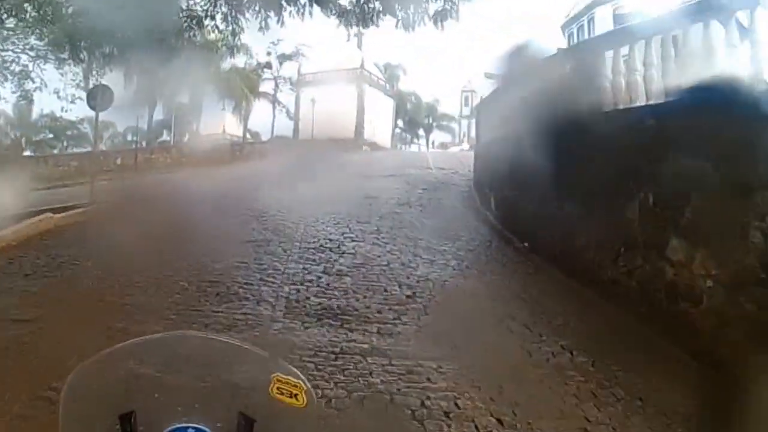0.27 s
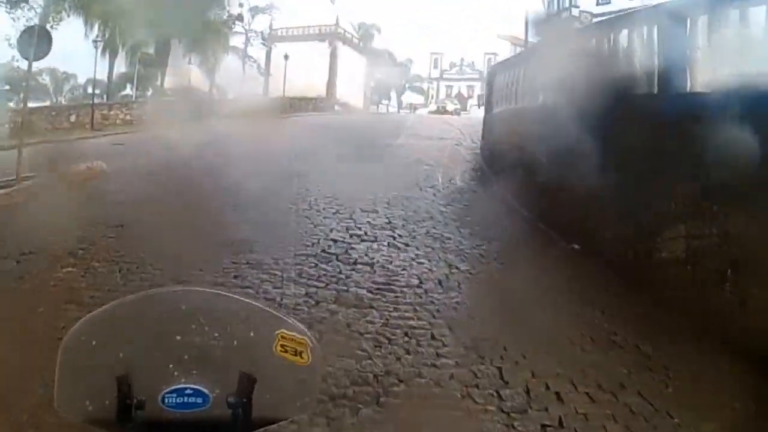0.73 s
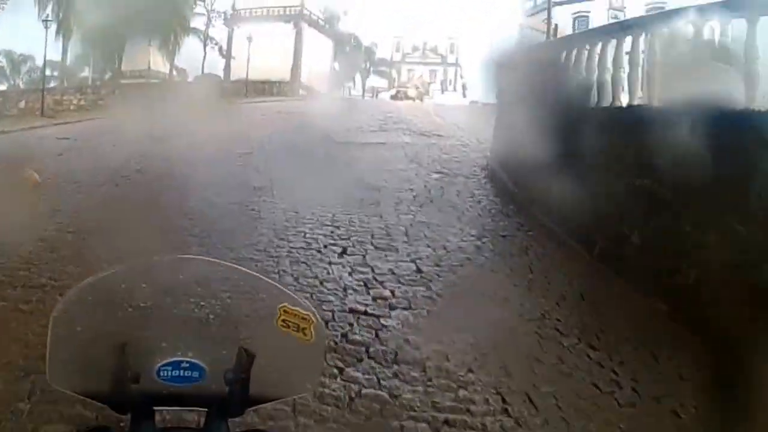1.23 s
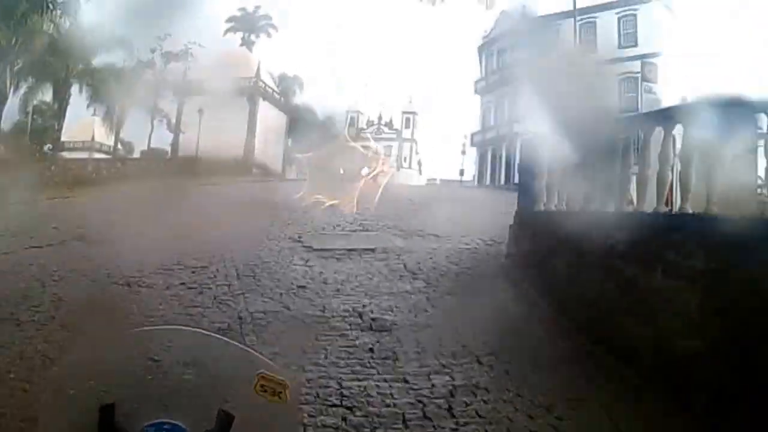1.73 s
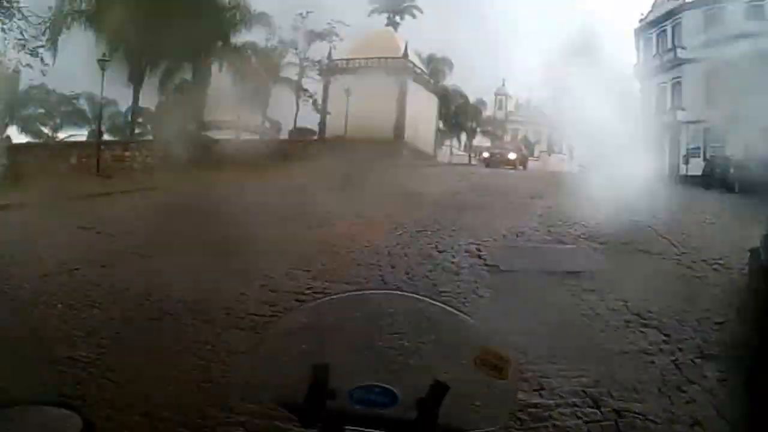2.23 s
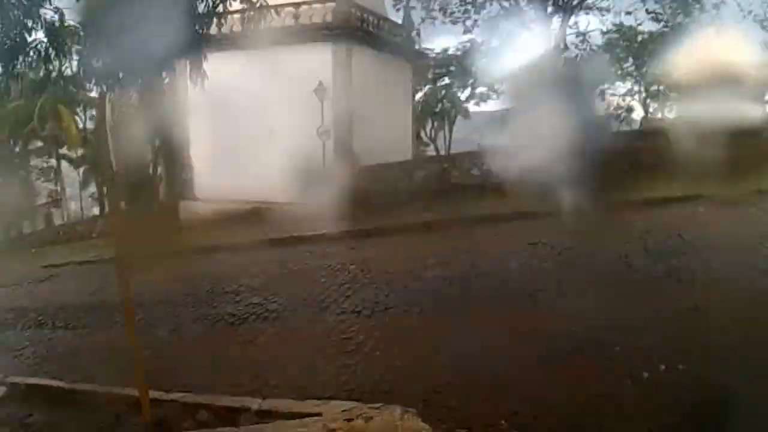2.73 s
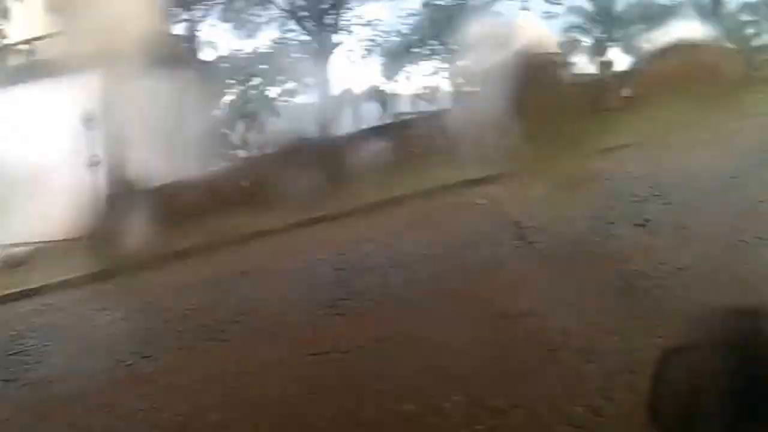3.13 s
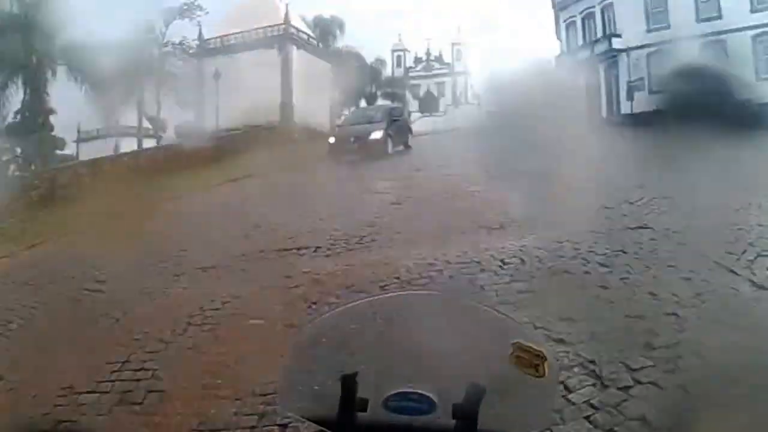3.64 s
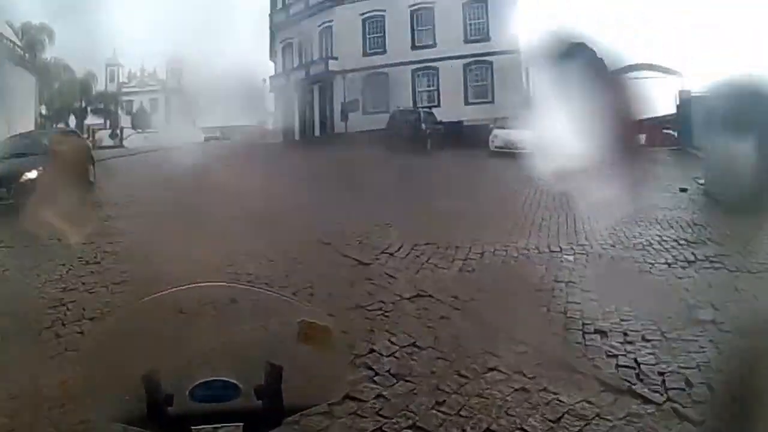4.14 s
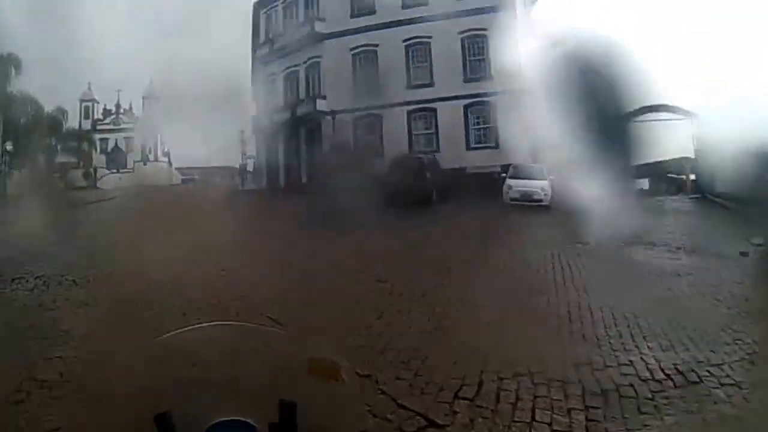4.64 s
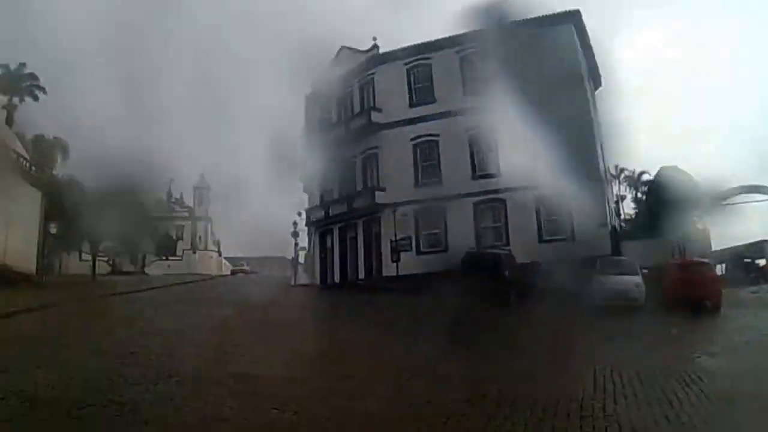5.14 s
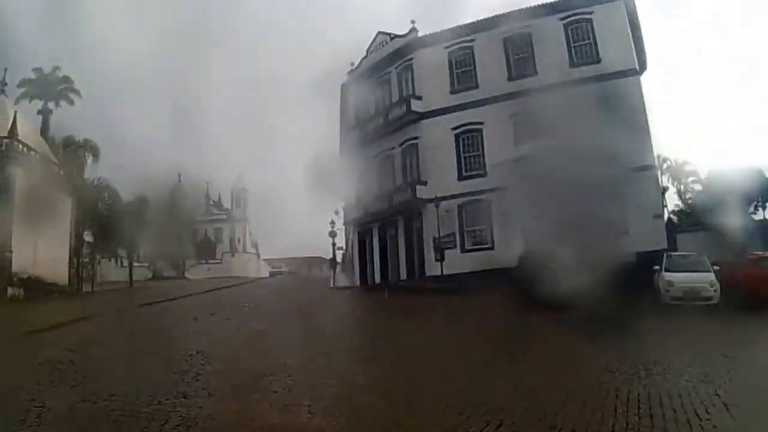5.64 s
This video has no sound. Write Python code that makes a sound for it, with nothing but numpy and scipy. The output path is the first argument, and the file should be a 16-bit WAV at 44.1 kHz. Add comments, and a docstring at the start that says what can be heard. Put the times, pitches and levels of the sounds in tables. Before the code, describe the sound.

Close, boxed-in sound: fine rain patters constantly on hard plastic while single larger drops pop at random, dry and mid-pitched. Small dull bumps with loose rattling interrupt now and then, strongest near three seconds. Two very loud drops strike just before four and a half seconds, then dense tapping continues to the end. Engine and tyres are only a weak, muffled rumble behind soft rain wash and faint electronic hiss.

```python
"""Inside a sealed waterproof camera case on a motorcycle riding slowly over wet cobbles in the rain.
Drops tap the plastic: random pushes ring the modes of its wall, with a burst of noise for the spatter.
The mount knocks over the bumps: a blow and sparse loose contacts drive its modes and rattle the case.
Behind lie shaped noise for the muffled rain wash and faint rumble, and the recorder's own hum and hiss."""
import sys
import numpy as np
from scipy import signal
from scipy.fft import rfft, irfft
from scipy.io import wavfile

SR = 44100
rng = np.random.default_rng(int(sys.argv[2]) if len(sys.argv) > 2 else 0)


def master(y):
    """Save y as 16-bit WAV."""
    cut = np.clip(np.atleast_2d(y).T, -1, 1)
    pcm = np.round(cut * 32767)  # scale
    wavfile.write(sys.argv[1], SR, pcm.astype(np.int16))


N = 259749
TAP = np.arange(4096) / SR  # time axis of one short sound, in seconds
LEVEL_SPAN_S = .02  # short sounds are levelled as if their energy filled this span

RING_HZ, RING_T60_S = 1340, .032  # main mode of the case
MOUNT_HZ, MOUNT_T60_S = 308.5, 0.037  # main mode of the mount, before a knock's hardness shifts it
MOUNT_NUDGE_DB = -34.5  # a drop also nudges the mount: level over its ring

# Single drops on the case, each placed in time, from faint to loud; sharpness is tick level over ring
# columns: start_s [s], ring_db [dB], ring_hz [Hz], overtone_hz [Hz], sharpness_db [dB]
SINGLE_DROPS = [(.2584, -45, 1177, 1810, -23.5), (.4498, -59.5, 1174, 1830, -16.5),
                (.489, -58.5, 1320, 2000, -22.5), (.5896, -59.5, 1150, 1830, -12),
                (.952, -58, 1390, 1840, -20), (1.1447, -58, 1390, 1980, -20),
                (1.1574, -44, 1342, 1910, -13), (1.3474, -66, 1330, 1850, -5),
                (1.4531, -51.5, 1160, 1830, -20), (1.6944, -75.5, 1360, 2000, 11),
                (2.3126, -62, 1444, 2080, -10), (2.5996, -54.5, 1386, 1760, -14.5),
                (2.7632, -48, 1330, 1900, -12.5), (3.0722, -53.5, 1073, 2210, -23),
                (3.3296, -39.5, 1392, 2210, -1.5), (3.3866, -56.5, 1180, 1810, -14.5),
                (3.6254, -51, 1210, 1800, -22.5), (3.7044, -51, 1310, 2000, -13.5),
                (3.7507, -48, 1360, 1860, -23), (3.8856, -49.5, 1275, 1860, -23.5),
                (3.9347, -65, 1360, 2500, -4.5), (4.1047, -62.5, 1230, 2160, -4.5),
                (4.3173, -58, 1310, 1970, -14), (4.378, -30, 1393, 2420, -19),
                (4.4715, -28, 1368, 2256, -19), (4.5891, -57, 1504, 1730, -9),
                (4.7735, -49.5, 1395, 2120, -17.5), (4.7867, -40, 1340, 2150, -20.5),
                (4.8267, -56.5, 1124, 1710, -19), (4.871, -58, 1310, 1970, -9.5),
                (4.8881, -40, 1417, 1710, -13.5), (4.9865, -50.5, 1370, 2020, -17),
                (5.0316, -50, 1220, 1760, -12), (5.0444, -39.5, 1340, 1750, -33),
                (5.181, -44.5, 1357, 1660, -22.5), (5.3371, -49.5, 1350, 1820, -8),
                (5.3588, -49.5, 1390, 2110, -13.5), (5.4531, -49.5, 1360, 1850, -7),
                (5.4691, -38.5, 1360, 2120, -15.5), (5.4899, -46, 1375, 1800, -8.5),
                (5.5855, -41.5, 1204, 2170, -27), (5.594, -46.5, 1380, 1830, -17.5),
                (5.6148, -51, 1440, 1750, -18), (5.6268, -52.5, 1350, 2030, -27),
                (5.6587, -44, 1360, 1700, -26.5), (5.6841, -46, 1290, 2100, -13.5),
                (5.8198, -42, 1444, 1740, -27.5)]
# Modes of the case wall above its main ring: pitch_hz [Hz], t60_s [s], level_db [dB]
UPPER_MODES = [(1700, .017, 1), (2020, .014, 0), (2330, .011, -3), (2620, .010, -8)]
# High wall modes that make the tick: pitch_hz [Hz], t60_s [s], level_db [dB]
TICK_MODES = [(3700, .009, 0), (4100, .008, 0), (4750, .008, -4), (5300, .007, -7)]
# Spectrum of the spatter: pitch_hz [Hz], level_db [dB per Hz]
SPATTER_SPECTRUM = [(5000, -6.5), (6000, -20), (7000, -4), (8000, -49), (9500, -4.5), (13000, -1),
                    (15800, -0.5)]


def rain_on_case():
    """Each drop pushes the wall, rings its modes and bursts into fine spatter."""
    ring, upper, tick, push, spatter_power = np.zeros((5, N))
    for start_s, ring_db, ring_hz, overtone_hz, sharp_db in list(SINGLE_DROPS) + small_drops():
        upper_db, push_db = drop_colour(ring_db, ring_hz, sharp_db)

        # the struck spot swells for a few cycles, with the main mode of the case ringing on
        swell = mode(ring_hz, .014) * (1 - np.exp(-TAP / .002))
        handed_on = np.interp(ring_db, [-46, -30], [.3, .1])
        main = swell + handed_on * mode(RING_HZ, RING_T60_S)
        struck = strike(splash(spread_s=0.0013, rough=0.11), main)
        add(ring, start_s, burst(band(struck, .82 * ring_hz, 1.69 * ring_hz, order=4), ring_db))

        overtones = mode(overtone_hz, 0.017) + 0.46 * wall(UPPER_MODES)
        add(upper, start_s, burst(strike(splash(spread_s=0.0012, rough=0.18), overtones), upper_db))

        ticking = strike(splash(spread_s=0.0016, rough=0.29), wall(TICK_MODES))
        add(tick, start_s, burst(ticking, ring_db + sharp_db))

        dull_push = burst(mode(853, 0.006), push_db)
        nudge = burst(mode(MOUNT_HZ, 0.061), ring_db + MOUNT_NUDGE_DB)
        add(push, start_s, dull_push + nudge)

        # loud, sharp drops throw the most spatter; overlapping bursts add as power
        spatter_db = ring_db + sharp_db + np.interp(ring_db, [-55, -40], [-11, -8])
        add(spatter_power, start_s, burst(np.exp(-TAP / 0.0013), spatter_db) ** 2)

    # the stiff wall passes little below its modes
    body = ring + band(upper, 1300, 2980, order=4) + band(tick, 3300, 5250, order=6)
    spatter = np.sqrt(spatter_power) * noise(SPATTER_SPECTRUM, 0)
    return body + band(push, 230, 906) + spatter


# A sharper drop has more overtone: level over the ring at the usual sharpness, dB gained per dB
USUAL_SHARP_DB, OVERTONE_DB, OVERTONE_SLOPE = -17, -1.5, 0.68
# Ring level beyond which the wall gives no further, and dB of push lost per dB of sharpness
YIELD_DB, PUSH_SLOPE = -40.5, 0.17
# A soft, low-ringing spot gives way more, at the usual sharpness
# columns: ring_hz [Hz], push_over_ring_db [dB]
PUSH_BY_RING = [(1060, -2), (1180, -21.5), (1345, -19.5), (1410, -31.5)]


def drop_colour(ring_db, ring_hz, sharp_db):
    """Levels of overtone and dull push follow from a drop's strength, spot and sharpness."""
    extra_db = sharp_db - USUAL_SHARP_DB
    upper_db = ring_db + OVERTONE_DB + OVERTONE_SLOPE * extra_db
    softness_db = np.interp(ring_hz, *np.transpose(PUSH_BY_RING))
    push_db = min(ring_db, YIELD_DB) + softness_db - PUSH_SLOPE * extra_db
    return upper_db, push_db


RAIN_PER_S = 43  # mean rate of small drops
SMALL_SHARP_DB, SHARP_SPREAD_DB = -15.5, 6  # usual sharpness, and its spread before the cap
# Typical ring level of the small drops over time: start_s [s], level_db [dB]
SMALL_DROP_LEVEL = [(0, -74.5), (.6, -74.5), (1.3, -67), (1.9, -72.5), (2.5, -74.5), (3.2, -70.5),
                    (4.1, -65), (4.7, -71), (5.2, -64.5), (5.89, -72.5)]


def small_drops():
    """Fine rain among the single drops: random times, sizes and spots, in the columns of SINGLE_DROPS."""
    chance = rng.standard_normal((600, 4))
    times = np.cumsum(rng.exponential(1 / RAIN_PER_S, len(chance)))
    size_db = 5 * np.minimum(chance[:, 0], 1.5)
    ring_db = np.interp(times, *np.transpose(SMALL_DROP_LEVEL)) + size_db
    ring_hz = RING_HZ * (1 + .025 * chance[:, 1])
    overtone_hz = 1900 * (1 + .09 * chance[:, 2])
    sharp_db = SMALL_SHARP_DB + SHARP_SPREAD_DB * np.minimum(chance[:, 3], 1)
    drops = zip(times, ring_db, ring_hz, overtone_hz, sharp_db)
    return [drop for drop in drops if drop[0] < N / SR]


DRIZZLE_PER_S, DRIZZLE_DB = 400, -70.5  # mean rate of droplets, overall level


def drizzle():
    """Tiny droplets, hundreds a second, keep the main mode of the case ringing."""
    hits = rng.standard_normal(N) * (rng.random(N) < DRIZZLE_PER_S / SR)
    ring = band(signal.fftconvolve(hits, mode(RING_HZ, RING_T60_S))[:N], 1000, 2100)
    return ring * undb(DRIZZLE_DB) / ring.std()


# Only a jolt that rattles the case above this level sets it swaying
SWAY_FROM_DB, SWAY_UNDER_RATTLE_DB = -61, -9.5
# Knocks of the mount: start_s [s], knock_db [dB], rattle_db [dB]
KNOCKS = [(.643, -69, -74), (.784, -66, -69), (0.9886, -55, -56.5), (1.083, -67.5, -57),
          (1.72, -68.5, -67.5), (2.136, -71.5, -66.5), (2.332, -74, -71), (2.718, -56, -54.5),
          (3.019, -64.5, -54.5), (3.1155, -54, -51), (3.203, -69.5, -58.5), (5.1808, -55, -56),
          (5.295, -70, -56)]
# Further modes of the mount: pitch_hz [Hz], t60_s [s], level_db [dB]
MOUNT_MODES = [(170, 0.021, -17), (407, 0.036, -13.5), (603, 0.017, -2.5), (710, 0.022, -20)]


def mount_knocks():
    """On a bump the mount hits its stop: a dull knock, a rattle, late ticks and, if strong, a low sway."""
    out = np.zeros(N)
    blow = signal.unit_impulse(len(TAP))
    for start_s, knock_db, rattle_db in KNOCKS:
        # a hard knock presses the joint tight: higher, shorter and brighter than a gentle one
        hard = np.clip((knock_db + 68) / 12, 0, 1)
        main = mode(MOUNT_HZ * (0.82 + .15 * hard), MOUNT_T60_S * (1.5 - 0.74 * hard))
        mount = main + wall(MOUNT_MODES)
        knock = band(strike(blow + 0.17 * chatter(0.024), mount), 155, 560 + 660 * hard)

        # loose contacts ring the wall
        loose = chatter(0.022) + 0.17 * blow
        contacts = strike(blow + .5 * loose, splash(spread_s=.0005, rough=.12))
        case = mode(1270, .012) + .25 * wall(UPPER_MODES)
        rattle = band(strike(contacts, case), 800, 2600)
        add(out, start_s, burst(knock, knock_db) + burst(rattle, rattle_db))

        if rattle_db > SWAY_FROM_DB:
            sway = -mode(38, .16) + .35 * mode(100, .23) + .4 * mode(78, .1)
            add(out, start_s + .004, burst(sway, rattle_db + SWAY_UNDER_RATTLE_DB))

        # the same loose contacts tick sharply, a moment later
        scratch = strike(loose, splash(spread_s=0.00063, rough=0.21))
        wall_tick = burst(band(strike(scratch, wall(TICK_MODES)), 3100, 5200, order=4), 0)
        fine_tick = burst(band(scratch, 9500, 15000, order=5), 0)
        add(out, start_s + .007, burst(wall_tick + fine_tick, rattle_db - 15))
    return out


WASH_DB, RUMBLE_DB = -73.5, -83  # levels before the random wander
# Spectrum of the muffled rain wash: pitch_hz [Hz], level_db [dB per Hz]
WASH_SPECTRUM = [(600, -16), (880, -15), (1130, -1.5), (1250, -2.5), (1580, -16.5), (1750, -3.5),
                 (2020, -4.5), (2300, -13), (2650, -12.5), (3200, -27.5), (3950, -15), (4700, -31),
                 (6000, -46)]
# Spectrum of the faint rumble: pitch_hz [Hz], level_db [dB per Hz]
RUMBLE_SPECTRUM = [(15, 6.5), (35, -1.5), (70, 1.5), (105, 2), (150, 0), (200, 1.5), (295, 3), (380, -3.5),
                   (500, -10), (700, -37)]


def ride():
    """Rain wash, engine and tyres through the closed case: two shaped noises whose levels wander."""
    wash = noise(WASH_SPECTRUM, WASH_DB) * undb(2 * walk(90))
    rumble = noise(RUMBLE_SPECTRUM, RUMBLE_DB) * undb(walk(9.9))
    return wash + rumble


HISS_DB = -82
# Faint steady hum tones: pitch_hz [Hz], level_db [dB]
HUM_TONES = [(60, -91.5), (120, -101), (180, -100), (240, -113.5), (300, -91.5), (600, -95.5)]
# Spectrum of the hiss: pitch_hz [Hz], level_db [dB per Hz]
HISS_SPECTRUM = [(5000, -14.5), (8000, -15), (10000, -3), (12500, 2.5), (15800, 1.5)]


def electronics():
    """The recorder's own faint hum, as steady sines, and hiss, as shaped noise."""
    t = np.arange(N) / SR
    hum = np.zeros(N)
    for hz, db in HUM_TONES:
        hum += np.sqrt(2) * undb(db) * np.sin(2 * np.pi * (hz * t + rng.random()))
    return hum + noise(HISS_SPECTRUM, HISS_DB)


def splash(spread_s, rough):
    """Force of a drop: the first contact, then an uneven push as the water spreads."""
    force = rough * rng.standard_normal(len(TAP)) * np.exp(-TAP / spread_s)
    force[0] += 1
    return force


def chatter(decay_s):
    """Sparse little contacts of loose parts, dying away."""
    contacts = rng.random(len(TAP)) < 220 / SR  # 220 per second on average
    return rng.standard_normal(len(TAP)) * contacts * np.exp(-TAP / decay_s)


def mode(hz, t60):
    """One struck resonance: a sine that falls 60 dB in t60 seconds."""
    return np.sin(2 * np.pi * hz * TAP) * np.exp(-np.log(1000) * TAP / t60)


def wall(modes):
    """A set of modes, weighted and detuned afresh at every strike."""
    chance = rng.standard_normal((len(modes), 2)) * (3, .025)  # spread in dB, and as a share of pitch
    return sum(undb(db + lift_db) * mode(hz * (1 + detune), t60)
               for (hz, t60, db), (lift_db, detune) in zip(modes, chance))


def strike(force, response):
    """Drive a response with a force."""
    return signal.fftconvolve(force, response)[:len(TAP)]


def noise(points, db):
    """Noise with a spectrum of (Hz, dB) points, falling away beyond both ends."""
    hz, gain_db = np.transpose(points)
    f = np.maximum(np.arange(N // 2 + 1) * SR / N, 1)
    skirts = np.minimum(f / hz[0], 1) ** 2 * np.minimum(hz[-1] / f, 1) ** 6
    shape = skirts * undb(np.interp(np.log(f), np.log(hz), gain_db))
    x = irfft(rfft(rng.standard_normal(N)) * shape, N)
    return x * undb(db) / x.std()


def walk(rate):
    """Random wander with a spread a little under 1, through `rate` random knots per second."""
    knots = rng.standard_normal(int(N / SR * rate) + 2)
    return np.interp(np.arange(N) / SR * rate, np.arange(len(knots)), knots)


def band(x, lo_hz, hi_hz, order=2):
    """Causal band-pass."""
    edges = [lo_hz, min(hi_hz, .49 * SR)]
    return signal.sosfilt(signal.butter(order, edges, "band", fs=SR, output="sos"), x)


def burst(x, db):
    """Scale a short sound to a level taken over LEVEL_SPAN_S."""
    return x * undb(db) / np.sqrt(np.sum(x ** 2) / (LEVEL_SPAN_S * SR))


def add(track, start_s, x):
    """Mix a short sound into a track at its start time."""
    i = int(start_s * SR)
    track[i:i + len(x)] += x[:len(track) - i]


def undb(db):
    """Decibels to gain."""
    return 10 ** (np.asarray(db) / 20)


def scene():
    """Everything reaches one microphone inside the case."""
    return (rain_on_case() + drizzle() + mount_knocks() + ride() + electronics())[None]


TOP_HZ = 16200  # upper limit of the microphone path


def record(dry):
    """The microphone path has a narrow notch at 2990 Hz and a steep cut of the top."""
    notched = signal.lfilter(*signal.iirnotch(2990, 14, fs=SR), dry)
    return signal.sosfilt(signal.ellip(10, .2, 70, TOP_HZ, fs=SR, output="sos"), notched)


dry = scene()
out = record(dry)
master(out)
```